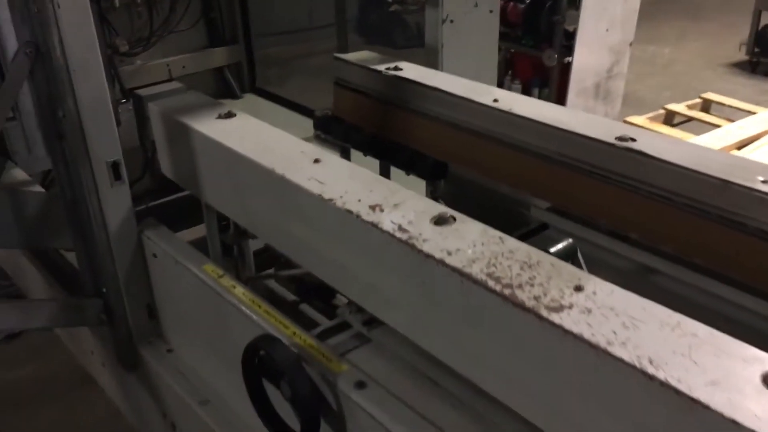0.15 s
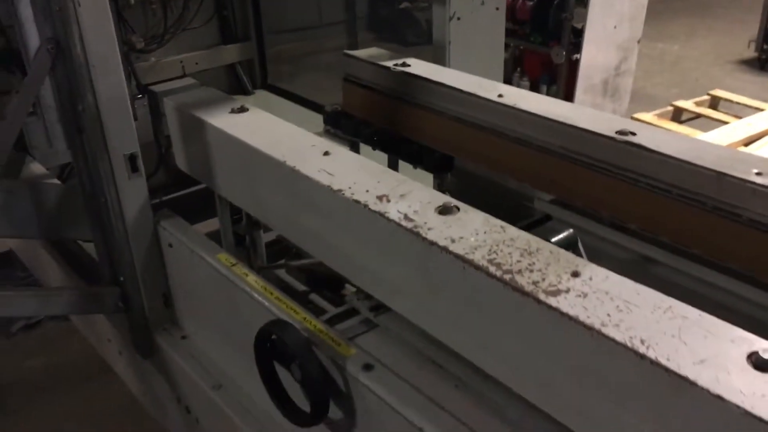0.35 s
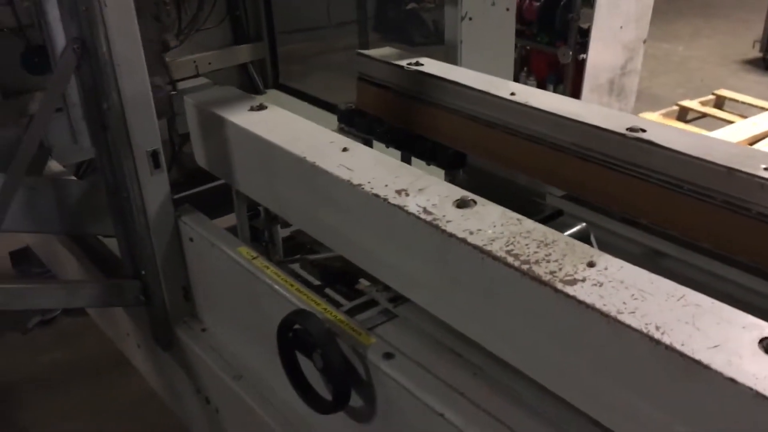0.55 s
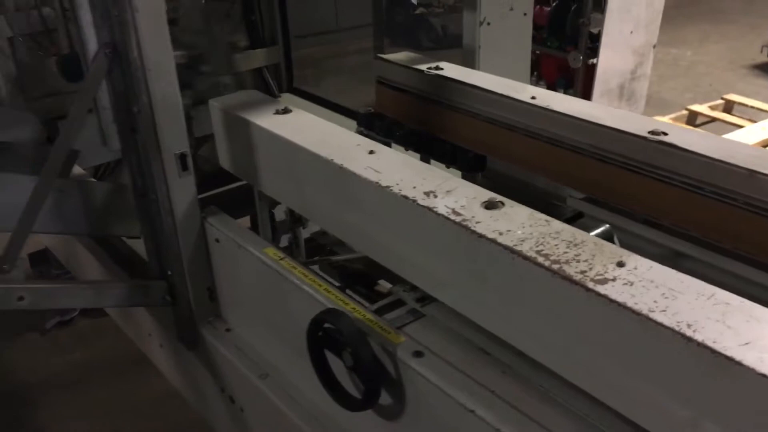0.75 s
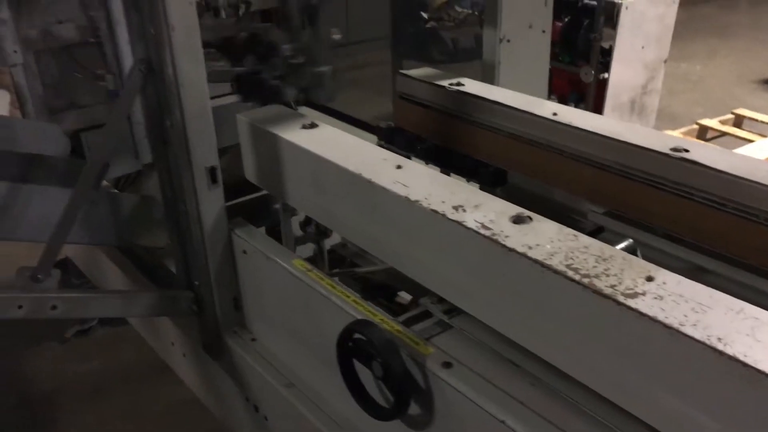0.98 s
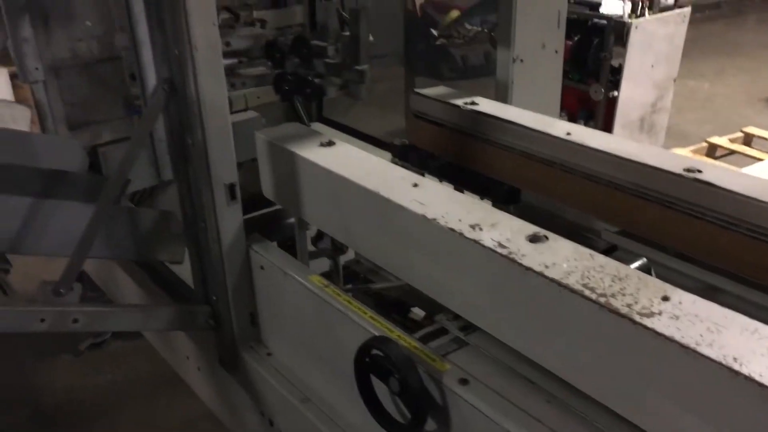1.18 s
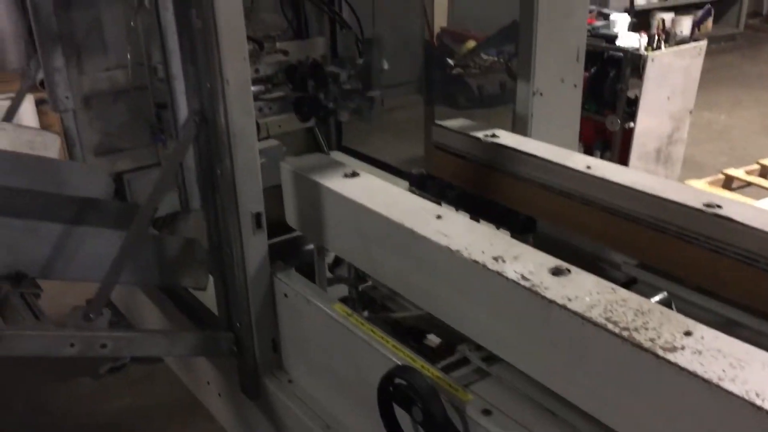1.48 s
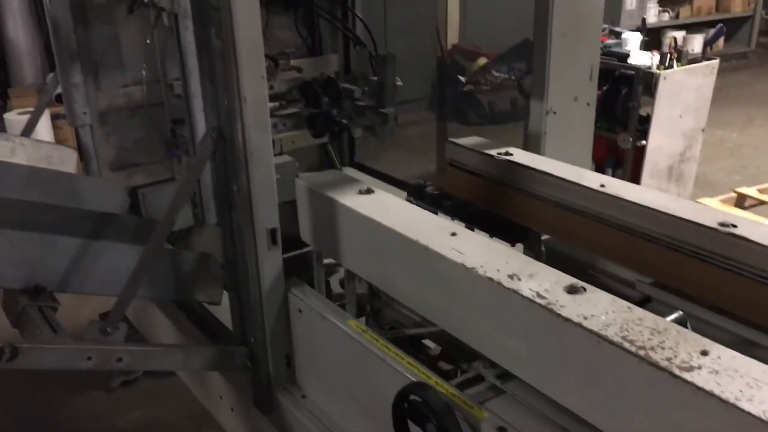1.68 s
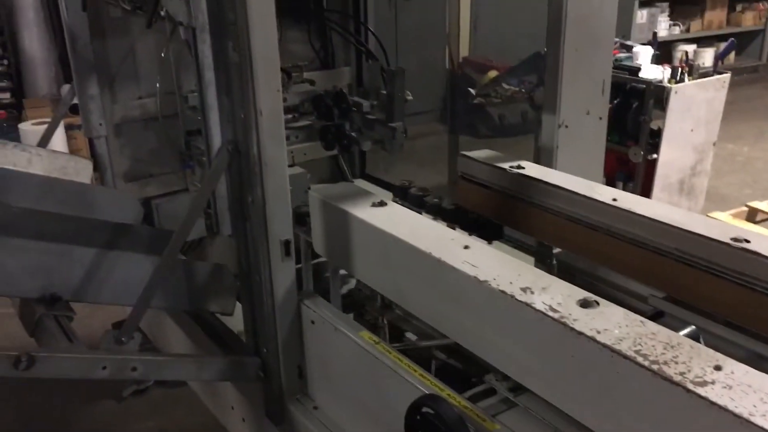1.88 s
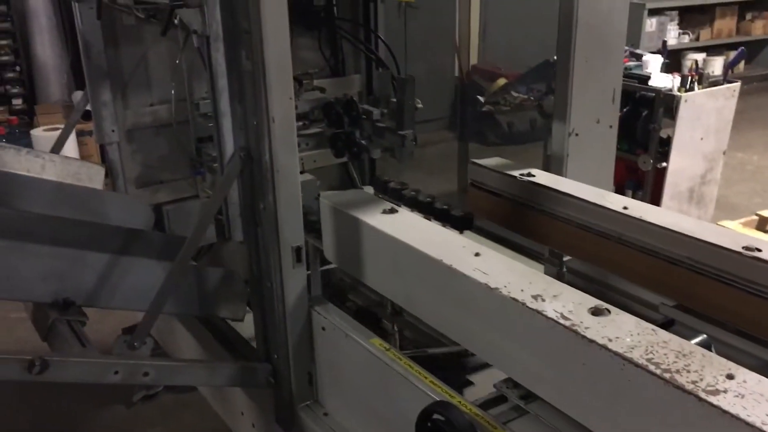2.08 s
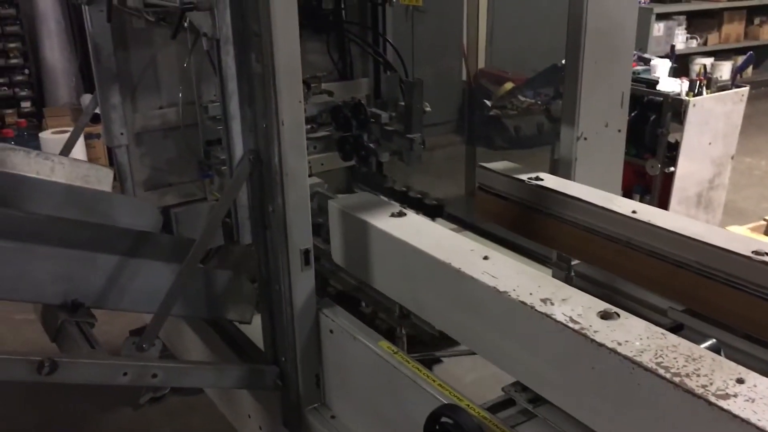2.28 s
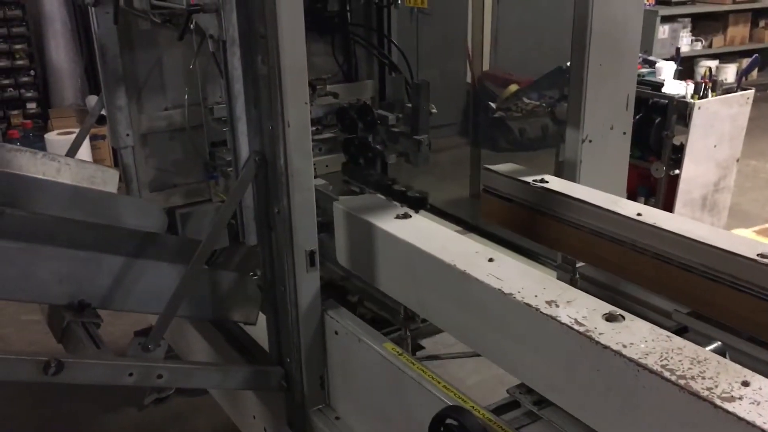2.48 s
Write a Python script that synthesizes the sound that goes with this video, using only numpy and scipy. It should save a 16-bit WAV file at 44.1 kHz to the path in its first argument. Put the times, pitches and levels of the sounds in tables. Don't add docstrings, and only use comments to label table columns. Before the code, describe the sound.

A loud, steady jet of escaping air with dull handling thumps, ending in a sharp valve click.

```python
import sys
import numpy as np
from scipy import signal
from scipy.fft import rfft, irfft, next_fast_len
from scipy.io import wavfile
from scipy.ndimage import uniform_filter1d, map_coordinates

SR = 44100
rng = np.random.default_rng(int(sys.argv[2]) if len(sys.argv) > 2 else 0)


def undo_db(level):
    steps = np.asarray(level, float) / 20
    return 10 ** steps


def master(y):
    cut = np.clip(np.atleast_2d(y).T, -1, 1)
    pcm = np.round(cut * 32767)
    wavfile.write(sys.argv[1], SR, pcm.astype(np.int16))


N = 116865
TIME_S = np.arange(N) / SR


def unit(x):
    return x / np.sqrt(np.mean(x ** 2) + 1e-20)


def along(points, hz):
    f, v = np.transpose(points)
    return np.interp(np.log(hz + 1), np.log(f + 1), v)


def lifts(peaks, hz):
    return sum(db / (1 + (2 * (hz - centre) / w) ** 2) for centre, w, db in peaks)


def resonances(peaks):
    def response(hz):
        total = 0
        for k, (centre, w, db) in enumerate(peaks):
            damping = 1j * hz * w
            total = total + (-1) ** k * undo_db(db) * damping / (centre ** 2 - hz ** 2 + damping)
        return total
    return response


def comb():
    depth_db, spacing_hz = 1.4, 35
    knots = rng.standard_normal(int(SR / 2 / spacing_hz) + 4)
    return lambda hz: depth_db * map_coordinates(knots, [hz / spacing_hz])


def wobble(rate_hz):
    knots = rng.standard_normal(int(N * rate_hz / SR) + 4)
    return map_coordinates(knots, [TIME_S * rate_hz])


def filtered(x, response):
    m = next_fast_len(N + SR // 2)
    return irfft(rfft(x, m) * response(np.fft.rfftfreq(m, 1 / SR)), m)[..., :N]


def rush(gain, patchy_db, ripple_db=0):
    z = signal.stft(rng.standard_normal(N), nperseg=512)[2]
    patches = uniform_filter1d(uniform_filter1d(rng.standard_normal(z.shape), 6, 0), 10, 1)
    ripples = uniform_filter1d(rng.standard_normal(z.shape), size=150, axis=1)
    z = z * undo_db(patchy_db * unit(patches) + ripple_db * unit(ripples))
    return unit(filtered(signal.istft(z, nperseg=512)[1][:N], gain))


def burst(start_s, t60_s, rise_s):
    out, first = np.zeros(N), int(np.ceil(start_s * SR))
    t = np.arange(first, min(N, first + int(2 * t60_s * SR) + 1)) / SR - start_s
    out[first:first + len(t)] = np.clip(t / rise_s, 0, 1) * undo_db(-60 * t / t60_s)
    return out


def bursts(rows, t60_s, rise_s):
    return sum(undo_db(db) * burst(s, t60_s, rise_s) for s, db in rows)


def struck(rows, rise_s):
    sag = .08
    out = np.zeros(N)
    for s, db, hz, t60_s in rows:
        t = TIME_S - s
        tone = np.sin(2 * np.pi * hz * t * (1 - sag * t / t60_s))
        out += undo_db(db) * burst(s, t60_s, rise_s) * tone
    return out


def hum():
    duck_s = [0, .23, .3, 2.3, 2.4, 2.65]
    duck_gain_db = [0, 0, -4, -4, 0, 0]
    # [f/Hz, level/dB per Hz]
    hum_spectrum = [(15, -41), (25, 6.5), (80, 7.5), (250, -2), (450, -9.5), (1500, -11), (3000, -20.5),
                    (6500, -22), (9000, -27), (15600, -30)]
    # [f/Hz, width/Hz, lift/dB]
    hum_peaks = [(104, 72, 0.5), (108, 16, -2), (320, 24, 3.5), (836, 55, 9.5), (1172, 25, 8.5),
                 (1650, 58, 9.5)]
    mains_hz, mains_db, hum_db = 118, -39.5, -37.5
    duck_db = np.interp(TIME_S, duck_s, duck_gain_db)
    mains = np.sin(2 * np.pi * mains_hz * TIME_S + 1.2 * wobble(6.4))
    mains = undo_db(mains_db + duck_db + 0.83 * wobble(7.1)) * mains
    air = rush(lambda hz: undo_db(along(hum_spectrum, hz) + lifts(hum_peaks, hz)), patchy_db=0.5)
    return mains + undo_db(hum_db + duck_db + 0.8 * wobble(5.55)) * air


def thuds():
    # [t/s, peak level/dB, f/Hz, decay/s]
    opening = [(.2305, -16, 215, .07), (.231, -21, 330, .05), (.2315, -21, 470, .05), (.231, -27, 700, .04),
               (.231, -22, 950, .05)]
    # [t/s, peak level/dB, f/Hz, decay/s]
    jolts = [(0.43, -7, 185, 0.062), (0.46, -20, 70, 0.1), (0.485, -19, 150, 0.1), (0.512, -19, 125, 0.076),
             (0.611, -30.5, 92.6, 0.23), (1.076, -32, 153.4, 0.57), (1.121, -29.5, 76, 0.36),
             (1.297, -30, 95, 0.29), (1.342, -20, 142, 0.12), (1.376, -22, 134, 0.38),
             (1.417, -19, 140, 0.2), (1.457, -12.5, 149, 0.089), (1.485, -22, 238, 0.15),
             (1.54, -27.5, 181, 0.36), (1.579, -22, 63.5, 0.31), (1.611, -23.5, 136, 0.32),
             (1.673, -25.5, 128.6, 0.31), (1.718, -27, 124.8, 0.7), (1.811, -26.5, 192, 0.3),
             (1.881, -27, 89, 0.37), (1.998, -32.5, 115.4, 0.4), (2.31, -35.5, 149, 0.5),
             (2.44, -22, 188, 0.15), (2.508, -20.5, 142.4, 0.22), (2.533, -30, 82.4, 0.42),
             (2.569, -30.5, 138, 0.28), (2.609, -27, 118, 0.24)]
    # [t/s, peak level/dB, f/Hz, decay/s]
    knocks = [(0.431, -16, 280.7, 0.15), (0.431, -23, 507, 0.071), (0.484, -25.5, 321, 0.11),
              (.61, -37, 320, 0.26), (1.065, -31.5, 335, 0.13), (1.287, -26, 300, 0.087),
              (1.801, -24.5, 372, 0.084), (2.425, -23, 274, 0.085), (2.487, -25, 321, 0.11)]
    # [t/s, peak level/dB, f/Hz, decay/s]
    taps = [(.461, -17.5, 149, 0.041), (.476, -16, 129, 0.046), (.531, -22, 148, .08),
            (.544, -24, 172, 0.069), (1.4, -33, 645, .06), (1.402, -28, 950, .06), (1.432, -23, 565, 0.052),
            (1.436, -17.5, 200, .05), (1.461, -12.5, 170, 0.048), (1.474, -18, 273, 0.056),
            (1.474, -27, 1085, .06), (1.493, -31, 676, 0.028), (1.535, -24, 990, 0.065),
            (1.556, -26, 675, .07), (1.558, -23, 260, 0.077), (1.578, -17, 120, .06),
            (1.644, -31, 900, 0.09), (1.685, -17, 148, 0.058), (1.808, -32, 250, 0.044),
            (1.809, -28, 530, 0.035), (1.81, -28, 790, .03), (2.432, -21, 244, .06),
            (2.532, -15, 130, 0.083), (2.567, -25, 170, 0.048), (2.615, -27, 140, .06)]
    # [t/s, level/dB, decay/s]
    rattles = [(0.23, -24, 0.24), (.43, -39, .1), (1.07, -34, 0.25), (1.309, -27.5, 0.38), (1.4, -28, 0.27),
               (1.431, -42, 0.22), (1.469, -24, 0.44), (1.539, -37, 0.15), (1.645, -31, 0.2),
               (1.808, -25, .08), (2.0, -39, 0.49)]
    # [f/Hz, width/Hz, level/dB]
    frame_modes = [(68.5, 60, -8), (100.6, 60, -2), (134.6, 39, -2), (189, 40, 0), (280, 45, -2),
                   (367, 40, -8), (506, 170, -15)]
    # [f/Hz, level/dB]
    rattle_spectrum = [(90, -25), (200, 8.5), (350, -3.5), (600, -5.5), (1100, -4.5), (1700, -1),
                       (2500, -13), (5000, -48)]
    jolt_rise_s, tap_rise_s, rattle_rise_s = .014, .002, .004
    shake_db, shake_lasts = -12, 1.2
    boom = struck(jolts + knocks, jolt_rise_s) + struck(opening + taps, tap_rise_s)
    shake = sum(undo_db(db + shake_db) * burst(s, shake_lasts * t60_s, jolt_rise_s) for s, db, hz, t60_s in jolts)
    shake = shake * rush(resonances(frame_modes), patchy_db=2)
    rattle = sum(undo_db(db) * burst(s, t60_s, rattle_rise_s) for s, db, t60_s in rattles)
    rattle = rattle * rush(lambda hz: undo_db(along(rattle_spectrum, hz)), patchy_db=3)
    return boom + shake + rattle


def valve():
    # [t/s, level/dB]
    clicks = [
        (.2305, -25),
        (.237, -28),
        (2.4815, -32),
        (2.4865, -32),
        (2.4915, -26),
        (2.499, -32),
        (2.511, -36),
        (2.523, -37),
    ]
    # [f/Hz, width/Hz, level/dB]
    body_modes = [(400, 200, -7), (800, 150, -5), (1100, 150, -5), (1360, 90, 1), (1600, 120, 1),
                  (2100, 300, -3), (2900, 250, -6)]
    # [t/s, peak level/dB, f/Hz, decay/s]
    rings = [(2.4815, -29, 2980, .12), (2.4815, -30, 2060, .05), (2.4865, -33, 1130, .15),
             (2.4865, -25, 3900, .04), (2.4865, -28, 5700, .03), (2.492, -27, 1346, .13),
             (2.492, -26, 1640, .12), (2.492, -28, 2060, .06), (2.492, -31, 2740, .05),
             (2.492, -30, 420, .05), (2.515, -35, 2480, .08)]
    # [t/s, level/dB]
    cracks = [
        (2.4815, -35),
        (2.4865, -24),
        (2.492, -30),
    ]
    # [f/Hz, level/dB]
    crack_spectrum = [(2000, -14), (4000, 0), (6500, -2), (9500, -11), (13000, -9), (15700, -10)]
    crack_rise_s = .0006
    knock = bursts(clicks, t60_s=.07, rise_s=.0012) * rush(resonances(body_modes), patchy_db=1)
    bright = rush(lambda hz: undo_db(along(crack_spectrum, hz)), patchy_db=5)
    return knock + struck(rings, crack_rise_s) + bursts(cracks, .03, crack_rise_s) * bright


def jet():
    # [t/s, strength/dB, top whistle brightness/dB]
    course = [(.218, -38, -4), (0.228, -39, 0), (0.231, -23.5, -6), (.243, -16.5, 3.5), (.26, -13, 3),
              (.41, -15.5, 1.5), (.47, -17.5, 1.5), (.8, -16.5, -0.5), (1.0, -18, 0.5), (1.17, -18, -1),
              (1.28, -17.5, -1.5), (1.38, -16.5, -0.5), (1.8, -17, -0.5), (2.2, -17, -0.5),
              (2.336, -16.5, -2), (2.39, -29, -0.5), (2.43, -58, 3), (2.47, -57, -2)]
    # [f/Hz, level/dB per Hz]
    early_jet = [(410, -32), (700, -23), (1840, -8), (2650, -10), (3900, -3.5), (4800, -6), (5900, -1),
                 (7000, -6), (7800, -17), (10100, -33), (17200, -120)]
    # [f/Hz, level/dB per Hz]
    facing_jet = [(410, -26), (700, -19), (1270, -16), (1920, -4.5), (2680, -13), (3340, -4), (4860, -3),
                  (5650, -1), (7800, -10), (10100, -64), (17200, -120)]
    # [f/Hz, level/dB per Hz]
    whistle = [(4590, -36.5), (7800, -13), (10300, -12), (11300, -6.5), (12700, -2.5), (13300, -4.5),
               (15600, -13.5)]
    # [f/Hz, width/Hz, lift/dB]
    cavities = [(2180, 40, 3), (3300, 500, 2.5), (3880, 200, 1), (4040, 100, -3), (4550, 260, 3),
                (4850, 200, -4.5), (5450, 150, 2), (6480, 100, 1), (7800, 300, -3)]
    # [f/Hz, width/Hz, lift/dB]
    early_lifts = [(1863, 50, 8), (4000, 72, 3), (5960, 120, 0), (7200, 50, 7), (11900, 60, 6.5)]
    # [f/Hz, width/Hz, lift/dB]
    late_lifts = [(1900, 200, 2), (2560, 45, 2), (3250, 300, 1.5), (5550, 250, 3)]
    # start, end [t/s]
    turn_s = (0.67, 0.94)
    # start, peak, end [t/s]
    pinch_s = (2.345, 2.36, 2.385)
    pinch_db, pinch_hz, pinch_width_hz = -27, 15600, 400
    whistle_db, patch_db = -1, .6
    ripple_db = 1.7

    def air(spectrum, own_lifts):
        ripple = comb()
        return rush(lambda hz: undo_db(along(spectrum, hz) + lifts(cavities + own_lifts, hz) + ripple(hz)),
                    patch_db, ripple_db)

    s, strength_db, bright_db = np.transpose(course)
    strength_db = np.interp(TIME_S, s, strength_db, -120, -120)
    bright_db = np.interp(TIME_S, s, bright_db)
    angle = np.pi / 2 * np.interp(TIME_S, turn_s, (0, 1))
    body = np.cos(angle) * air(early_jet, early_lifts) + np.sin(angle) * air(facing_jet, late_lifts)
    top = undo_db(whistle_db + bright_db + 0.59 * wobble(120)) * air(whistle, early_lifts)
    flutter_db = 0.34 * wobble(8.83) + 0.2 * wobble(250)
    squeal = rush(lambda hz: undo_db(-12 * ((hz - pinch_hz) / pinch_width_hz) ** 2), patch_db)
    squeal = undo_db(pinch_db) * np.interp(TIME_S, pinch_s, (0, 1, 0)) ** 2 * squeal
    return squeal + undo_db(strength_db + flutter_db) * (body + top)


def hall(x):
    # [f/Hz, t60/s]
    hall_t60 = [(150, 7.8), (1500, 1.9), (5000, 0.98), (7500, 0.99), (9000, 0.71), (15000, 0.34)]
    hall_db, delay_samples = -14.5, 300
    hz, t, z = signal.stft(rng.standard_normal(SR), SR, nperseg=256)
    tail = signal.istft(z * undo_db(-60 * t / along(hall_t60, hz)[:, None]), SR, nperseg=256)[1]
    late = signal.fftconvolve(np.pad(x, (delay_samples, 0)), tail / np.linalg.norm(tail))[:N]
    return x + undo_db(hall_db) * late


def scene():
    return (hall(jet() + valve()) + thuds() + hum())[None]


def band_limit(x):
    return signal.sosfilt(signal.butter(12, 15800, fs=SR, output="sos"), x)


def record(dry):
    ceiling, bass_cut_hz, top_hz, edge_hz = .95, 45, 15760, 60

    def band(hz):
        treble = undo_db(-12 * np.logaddexp(0, 4 * (hz - top_hz) / edge_hz))
        return treble / np.sqrt(1 + (bass_cut_hz / (hz + 1)) ** 4)

    limited = dry / (1 + np.abs(dry / ceiling) ** 6) ** (1 / 6)
    return band_limit(filtered(limited, band))


dry = scene()
out = record(dry)
master(out)
```